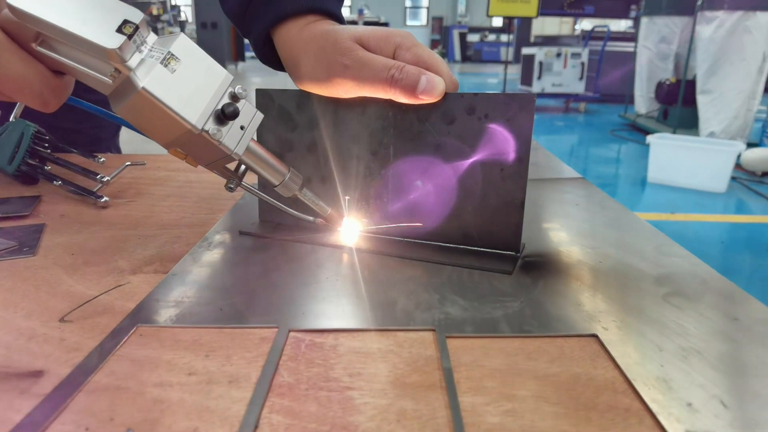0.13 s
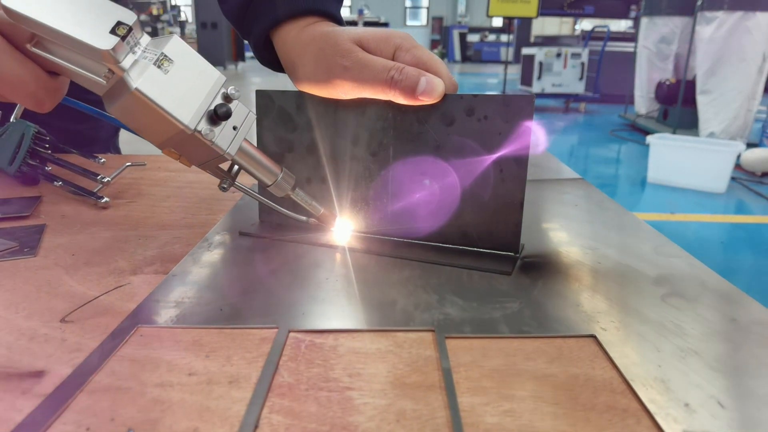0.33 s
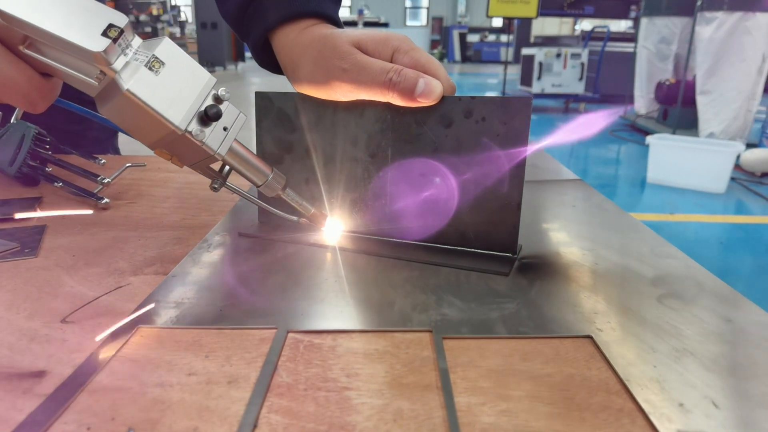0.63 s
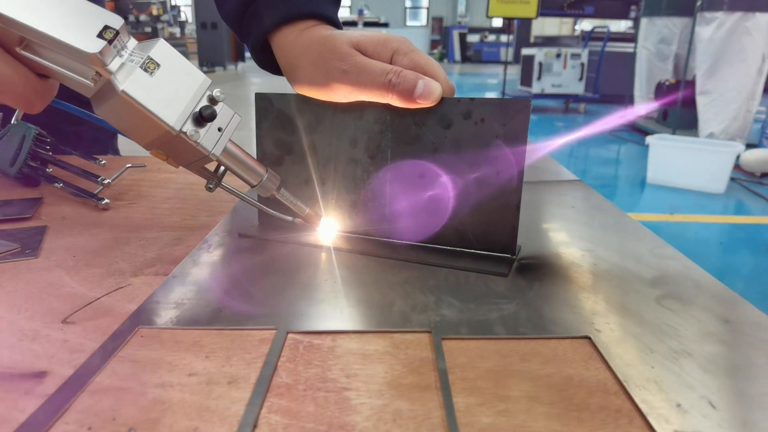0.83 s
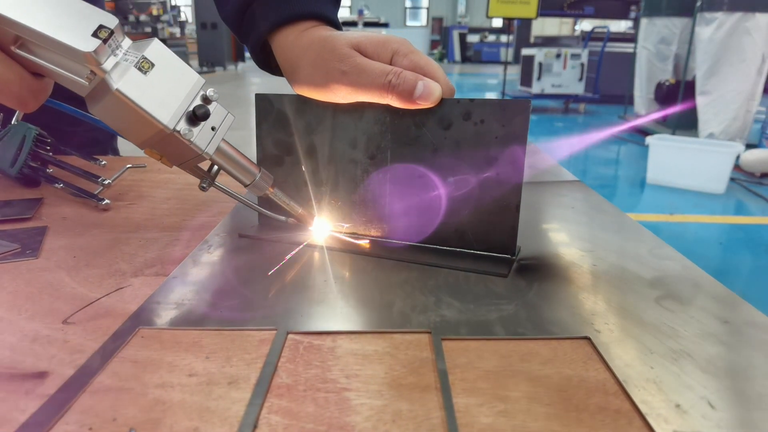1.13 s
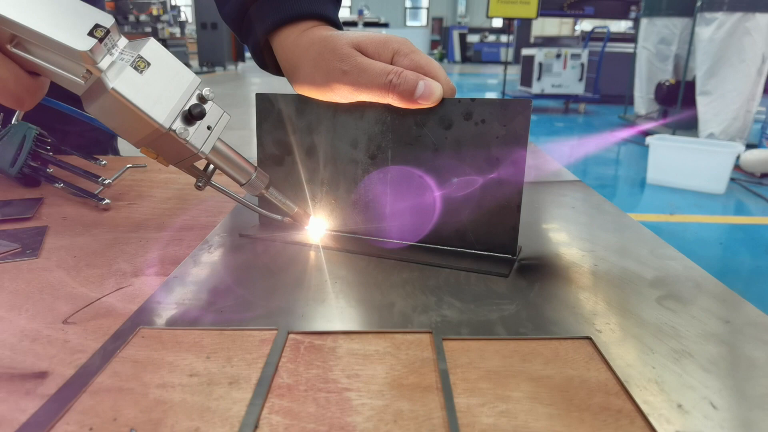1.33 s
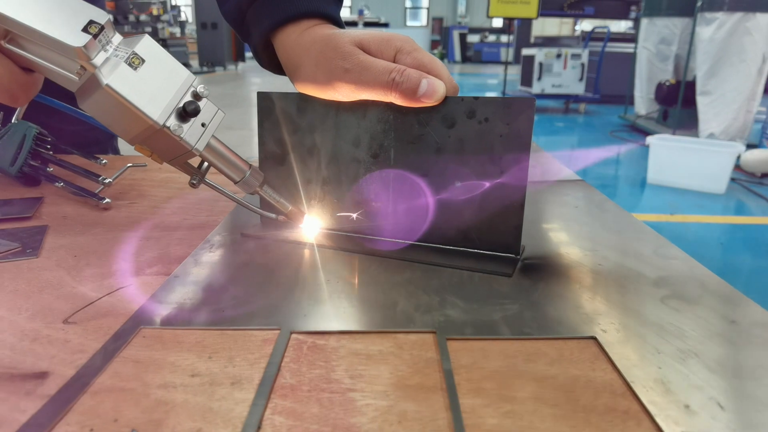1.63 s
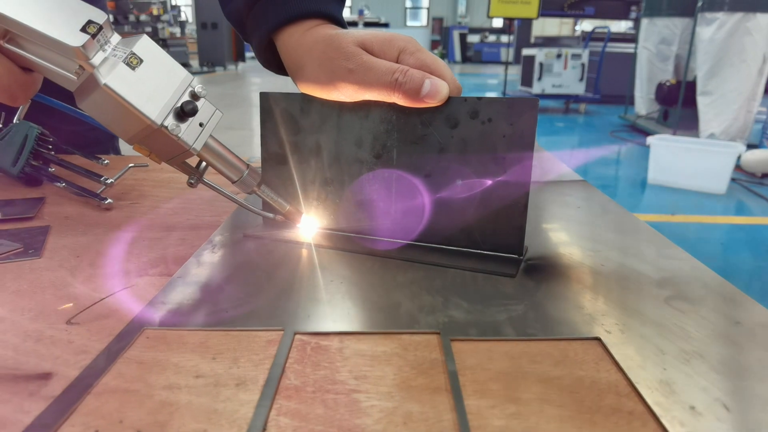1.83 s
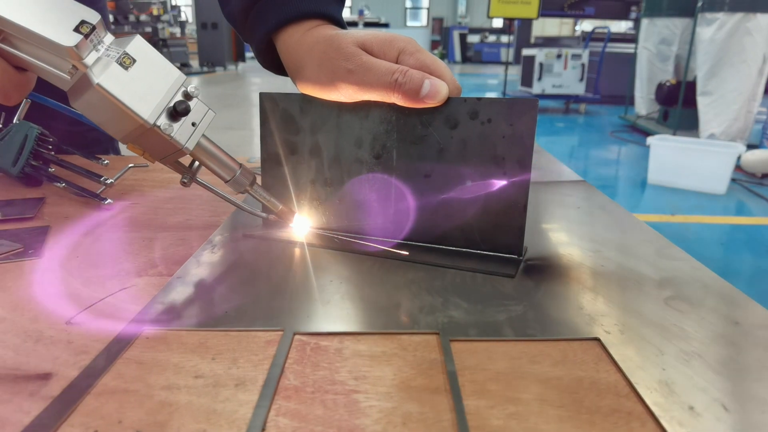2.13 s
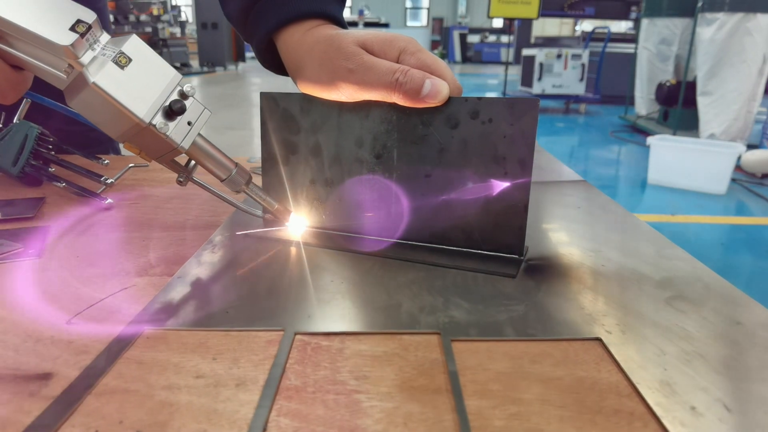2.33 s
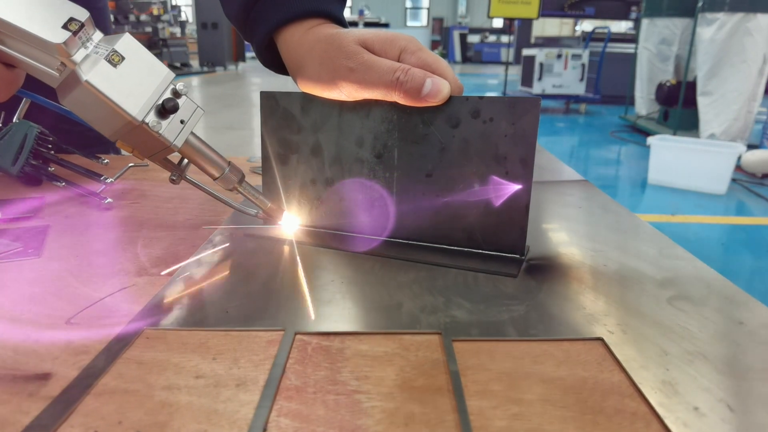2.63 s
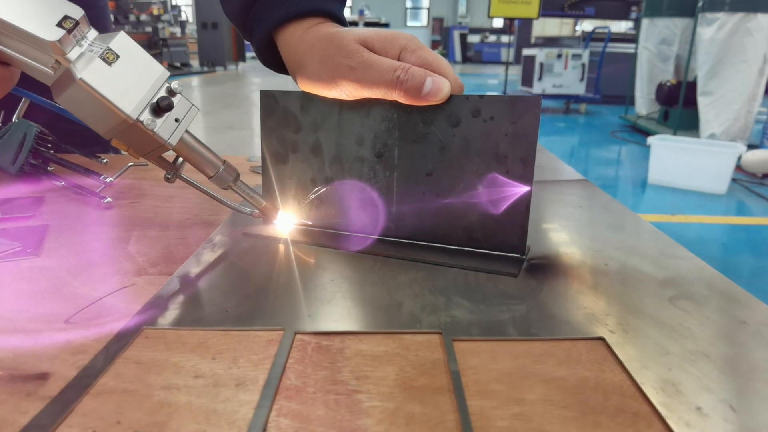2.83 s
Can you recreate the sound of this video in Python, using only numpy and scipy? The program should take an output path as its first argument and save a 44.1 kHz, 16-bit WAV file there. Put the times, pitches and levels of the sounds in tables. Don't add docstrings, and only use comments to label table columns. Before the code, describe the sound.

Close stereo pickup of a continuous harsh gas hiss from a welding torch on steel, grainy with sputter, gradually weaker on the right. A dull low knock dies away at the start beneath it; distant machines drone softly.

```python
import sys
import numpy as np
from scipy import signal
from scipy.fft import rfft, irfft
from scipy.io import wavfile
from scipy.ndimage import uniform_filter1d

SR = 44100
rng = np.random.default_rng(int(sys.argv[2]) if len(sys.argv) > 2 else 0)


def master(y):
    cut = np.clip(np.atleast_2d(y).T, -1, 1)
    pcm = np.round(cut * 32767)
    wavfile.write(sys.argv[1], SR, pcm.astype(np.int16))


def nominal_scale(level):
    x = np.asarray(level, float) / 20
    return 10 ** x


N = 131418

# time_s, jet_level_db, extra_right_lag_us, right_shading_db, edge_tone_db
TORCH_PATH = [(0, -1, -58, 2.5, 3.5), (.1, -1, -49, 2, 4.5), (.145, -8.5, -44, 2.5, 6.5),
              (.19, -2.5, -36, 2, 4.5), (.35, 0, -40, 1, 0.5), (.6, 0.5, -21, 0.5, -0.5),
              (.9, 1.5, -17, 0.5, -2), (1.25, 2, -8, 0, -2.5), (1.6, 1.34, 2.5, 1, -.5),
              (2.0, 1, 5.5, -2, 1), (2.16, 0.9, 6, -.5, 1), (2.24, 1.5, 5.5, -3.5, -0.5),
              (2.5, 0.75, 6, -4, 1), (2.75, 0.5, 20, -5, 1), (2.98, 2, 19, -5.5, -0.5)]
# centre_hz, width_hz, level_db
LEFT_RESONANCES = [(660, 200, -73.5), (1500, 250, -67.5), (2000, 1060, -56.5), (2890, 1040, -63.0),
                   (3850, 1750, -63.5), (4970, 850, -55.0), (5770, 830, -47.0), (6420, 430, -52.5),
                   (7580, 910, -61.0), (8380, 1420, -53.0), (10330, 920, -50.0), (12390, 1200, -63.5),
                   (13510, 1100, -64.0), (15300, 1400, -64.5)]
RIGHT_RESONANCES = [(750, 660, -74.5), (1470, 560, -64.0), (2370, 740, -58.0), (2970, 440, -63.0),
                    (4150, 810, -60.5), (4690, 470, -57.5), (5870, 780, -49.0), (6420, 560, -47.5),
                    (6880, 2250, -54.5), (8260, 870, -52.0), (10100, 1520, -56.5), (12440, 620, -72.0),
                    (13800, 1140, -66.5), (15310, 1390, -66.0)]
# centre_hz, width_hz, change_db
LEFT_INTERFERENCE = [(3450, 200, -2), (4120, 250, 2), (9600, 250, -3), (11650, 250, -4)]
RIGHT_INTERFERENCE = [(1580, 250, -5), (3620, 67, 8), (5430, 110, -11), (6260, 99, -5.5), (12700, 200, -3),
                      (13200, 400, -17)]
# frequency_hz, phase_rad
PHASE_LAG = [(200, -1.0), (1550, 1.9), (2170, .96), (2650, 3.1), (3050, 3.1), (3500, 2.2), (3950, 3.1),
             (4400, 3.45),
             (4760, 5.15), (5590, 3.7), (6790, 5.15), (7420, 8.5), (8690, 8.7), (9510, 7.2),
                  (9780, 9.35), (10900, 9.9),
             (11450, 9.5), (12300, 10.6), (14100, 12.2), (14900, 12.3), (15500, 11.8)]
# frequency_hz, share_ratio
LAG_SHARE = [(1500, 1.0), (2900, .95), (4200, .3), (6200, .55), (8000, 1.02), (10700, .95), (11450, .2),
             (14000, .9)]
# frequency_hz, share_ratio
SHADING_SHARE = [(1200, 0.38), (2300, 1.2), (2750, 0.054), (3600, 1.8), (6300, 0.51), (7400, 1.8),
                 (8500, .3), (10000, 0.78)]
# frequency_hz, coherence_0_to_1
COHERENCE = [(400, .9), (2800, .97), (3450, .5), (4000, .97), (6100, .95), (11400, .92), (12900, .35),
             (14200, .78)]
# time_s, level_db
FAR_SWELL = [(0.0, -48), (0.04, -46.5), (0.12, -54), (0.77, -41.5), (1.79, -50.5), (1.83, -41.5),
             (1.97, -41.5), (2.01, -55), (2.05, -44), (2.73, -51), (2.96, -47), (2.98, -41)]
# centre_hz, width_hz, level_db
FAR_RESONANCES = [(426.5, 150, -7.5), (672, 130, 0.5), (960, 137, 0.5)]
# pitch_hz, level_db (rms)
MAINS_LINES = [
    (102.3, -69),
    (199.2, -60),
    (398.4, -71.5),
]
# frequency_hz, density_db (per Hz)
FAN_SPECTRUM = [(15, -44), (25, 0), (75, 5.5), (147, 4), (194, 5.5), (263, -4.5), (305, 8), (387, -13.5),
                (600, -0.5), (780, -6), (1320, -120)]


def rms_one(x):
    return x / np.sqrt(np.mean(x ** 2) + 1e-20)


def at_hz(points, hz):
    table_hz, values = np.transpose(points)
    return np.interp(np.log(hz), np.log(table_hz), values)


def drift(rate, length, count=1):
    pole = np.exp(-2 * np.pi * rate)
    run_in = 6000
    noise = rng.standard_normal((count, length + run_in))
    slow = signal.lfilter([1], [1, -2 * pole, pole * pole], noise)[:, run_in:]
    return rms_one(slow).squeeze()


def resonant_path(resonances, interference, hz):
    power = 0
    for centre_hz, width_hz, level_db in resonances:
        power = power + nominal_scale(2 * level_db) / (1 + ((hz - centre_hz) / (width_hz / 2)) ** 2) ** 2
    change_db = 0
    for centre_hz, width_hz, depth_db in interference:
        change_db = change_db + depth_db * np.exp(-((hz - centre_hz) / (width_hz / 2)) ** 2)
    return np.sqrt(power) * nominal_scale(change_db)


def turbulence(fast_db, mid_db, slow_db):
    flutter_db = fast_db * drift(150 / SR, N) + mid_db * drift(20 / SR, N) + slow_db * drift(5.0 / SR, N)
    sputters_per_s, sputter_db, spread_db, decay_s = 75, -11, 3, 0.0013
    happens = rng.random(N) < sputters_per_s / SR
    strength = nominal_scale(sputter_db + spread_db * np.minimum(rng.exponential(1, N), 4))
    spits = happens * strength + 1e-18
    bursts = signal.lfilter([1], [1, -np.exp(-1 / (decay_s * SR))], spits)
    return nominal_scale(flutter_db) + bursts


def jet(patchy_db):
    frame, overlap = 512, 384
    white = rng.standard_normal((2, N)) * turbulence(fast_db=0.31, mid_db=.5, slow_db=0.34)
    hz, s, (common, scattered) = signal.stft(white, SR, nperseg=frame, noverlap=overlap)
    hz = np.maximum(hz, 1)[:, None]
    times, *columns = np.transpose(TORCH_PATH)
    level_db, lag_us, shade_db, edge_db = [np.interp(s, times, column) for column in columns]

    wander = drift(0.028, len(s), count=len(hz))
    patches = rms_one(uniform_filter1d(wander, size=12, axis=0))
    edge_hz, edge_width_hz = 8720, 2630
    edge_tone_db = edge_db * np.exp(-((hz - edge_hz) / edge_width_hz) ** 2)
    jet_db, low_cut_hz = 42.5, 785
    gain = nominal_scale(jet_db + level_db + patchy_db * patches + edge_tone_db) / (1 + (low_cut_hz / hz) ** 4)

    travel_s = at_hz(LAG_SHARE, hz) * lag_us / 10 ** 6
    phase_lag = at_hz(PHASE_LAG, hz) + 2 * np.pi * hz * travel_s
    alike = np.clip(at_hz(COHERENCE, hz), 0, 1)
    right = alike * common * np.exp(-1j * phase_lag) + np.sqrt(1 - alike ** 2) * scattered
    right = right * nominal_scale(shade_db * at_hz(SHADING_SHARE, hz))

    at_left = common * resonant_path(LEFT_RESONANCES, LEFT_INTERFERENCE, hz)
    at_right = right * resonant_path(RIGHT_RESONANCES, RIGHT_INTERFERENCE, hz)
    pair = gain * np.array([at_left, at_right])
    return signal.istft(pair, SR, nperseg=frame, noverlap=overlap)[1][:, :N]


def bench_echoes(pair):
    first_s, last_s, echo_db, count = .002, .02, -24, 12
    taps = np.zeros(int(last_s * SR) + 2)
    delays_s = np.geomspace(first_s, last_s, num=count) * rng.uniform(.9, 1, count)
    taps[(delays_s * SR).astype(int)] = nominal_scale(echo_db) * rng.choice([-1, 1], count)
    taps[0] = 1
    return signal.fftconvolve(pair, taps[None] / np.linalg.norm(taps), axes=1)[:, :N]


def far_machine():
    s, swell_db = np.transpose(FAR_SWELL)
    hz = np.fft.rfftfreq(N, 1 / SR)
    broad_hump = (645, 650, -5.5)  # centre_hz, width_hz, level_db
    colour = resonant_path(FAR_RESONANCES + [broad_hump], [], hz)
    mid, side = irfft(rfft(rng.standard_normal((2, N))) * colour, N)
    side = nominal_scale(-11) * side + 0.16 * mid
    level_db = np.interp(np.arange(N) / SR, s, swell_db) - 1.0 + 2.16 * drift(12 / SR, N)
    return nominal_scale(level_db) * np.array([mid + side, mid - side]) / np.std(mid)


def chiller_hum():
    t = np.arange(N) / SR
    rate = 11 / SR
    lines = 0
    for pitch_hz, level_db in MAINS_LINES:
        level = nominal_scale(level_db + 2.5 + 4.2 * drift(rate, N))
        lines = lines + level * np.sin(2 * np.pi * pitch_hz * t + 0.96 * drift(rate, N))
    return lines


def knock():
    t = np.arange(N) / SR
    pitch_hz, level_db, t60_s = 108, -46.5, .5
    return nominal_scale(level_db - 60 * t / t60_s) * np.sin(2 * np.pi * pitch_hz * t)


def fan_rumble(side_db):
    hz = np.maximum(np.fft.rfftfreq(N, 1 / SR), 1)
    colour = nominal_scale(at_hz(FAN_SPECTRUM, hz)) / (1 + (hz / 350) ** 4) / (1 + (22 / hz) ** 4)
    width = [np.ones_like(hz), nominal_scale(side_db) * (hz / 300)]
    mid, side = irfft(rfft(rng.standard_normal((2, N))) * colour * width, N)
    fade_db_per_s = -1.5
    level_db = -56 + fade_db_per_s * np.arange(N) / SR + 4.0 * drift(6.0 / SR, N)
    return nominal_scale(level_db) * np.array([mid + side, mid - side]) / np.std(mid)


def scene():
    torch = bench_echoes(jet(patchy_db=.7))
    return torch + far_machine() + chiller_hum() + knock() + fan_rumble(side_db=-2.5)


def roll_off(x):
    return signal.sosfilt(signal.butter(12, 15740, fs=SR, output="sos"), x)


def record(dry):
    knee, headroom, low_cut_hz = .55, .33, 37
    inside = np.clip(dry, -knee, knee)
    rounded = inside + headroom * np.tanh((dry - inside) / headroom)
    high_pass = signal.butter(2, low_cut_hz, "high", fs=SR, output="sos")
    finished = signal.sosfilt(high_pass, rounded)
    return roll_off(finished)


dry = scene()
out = record(dry)
master(out)
```